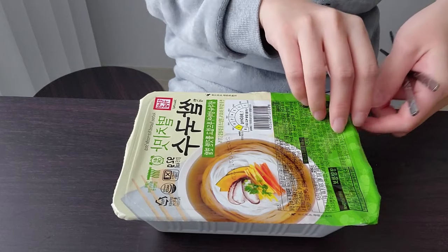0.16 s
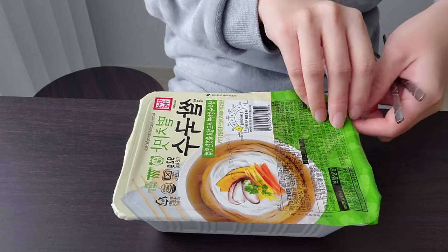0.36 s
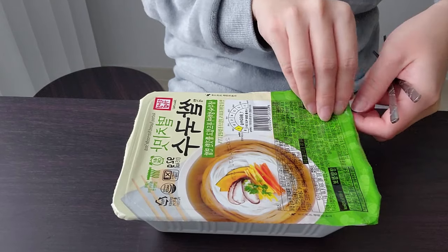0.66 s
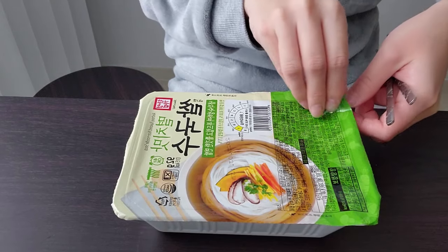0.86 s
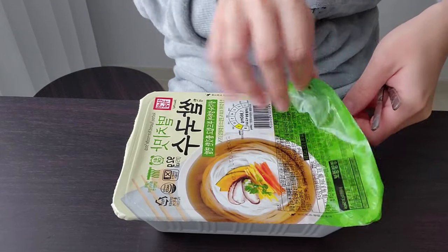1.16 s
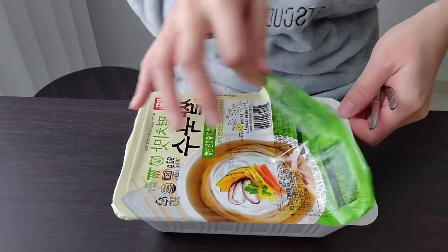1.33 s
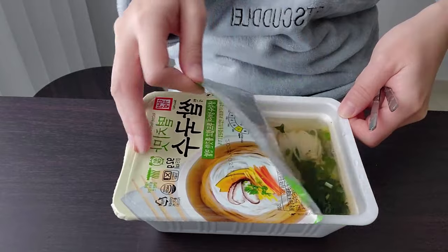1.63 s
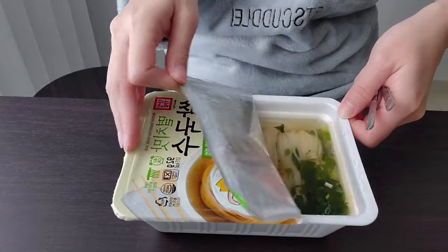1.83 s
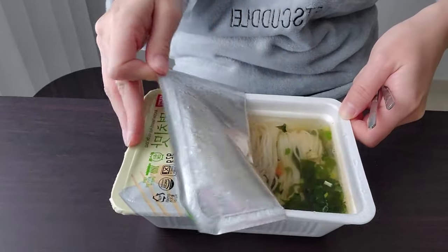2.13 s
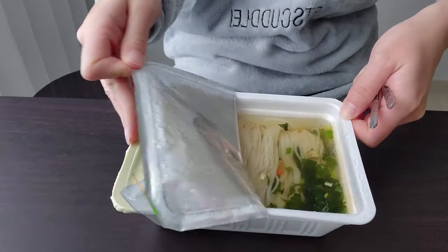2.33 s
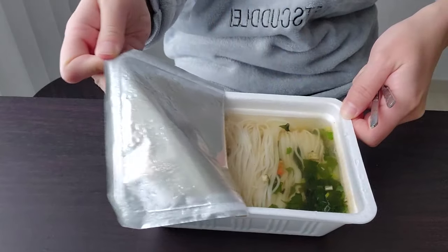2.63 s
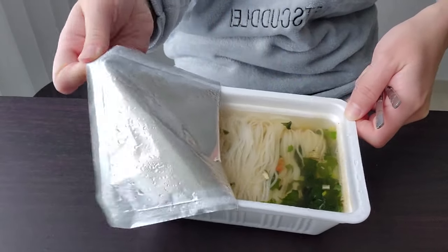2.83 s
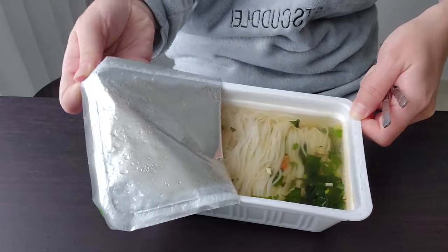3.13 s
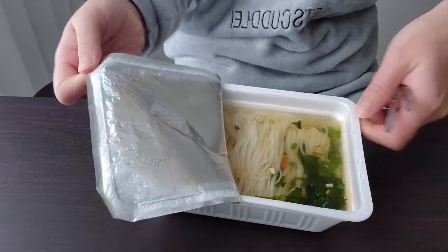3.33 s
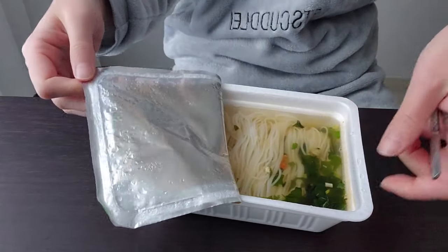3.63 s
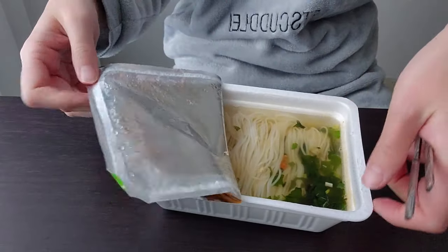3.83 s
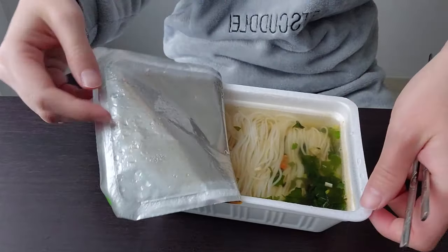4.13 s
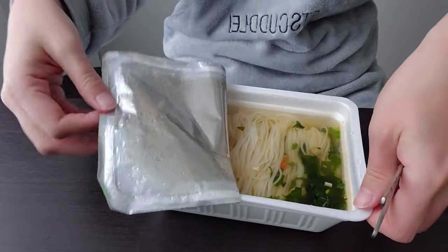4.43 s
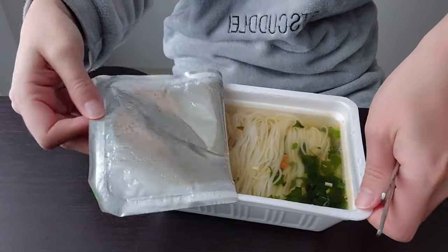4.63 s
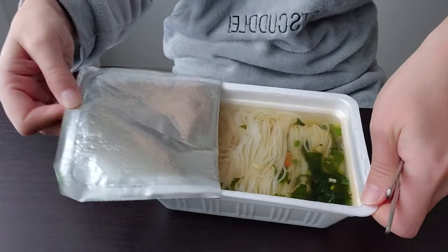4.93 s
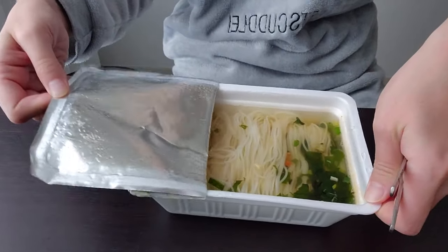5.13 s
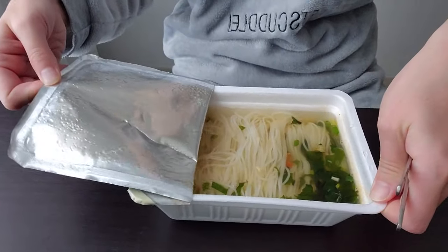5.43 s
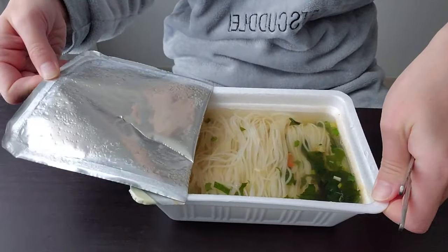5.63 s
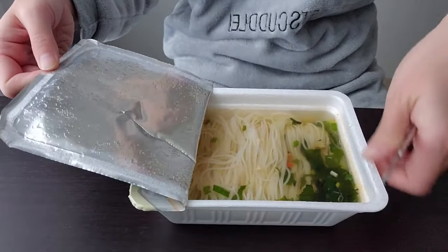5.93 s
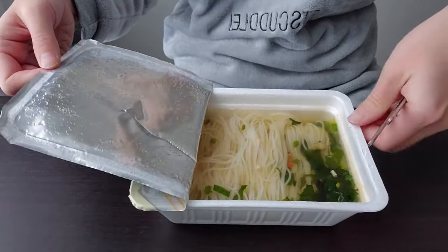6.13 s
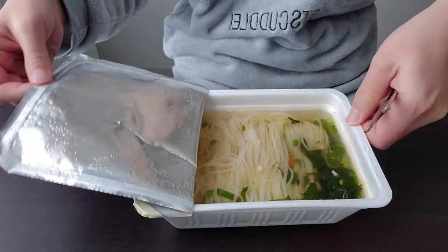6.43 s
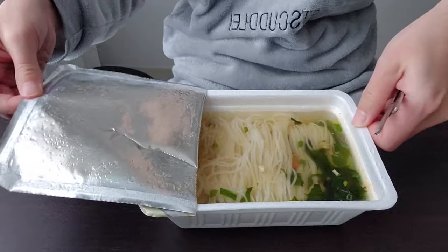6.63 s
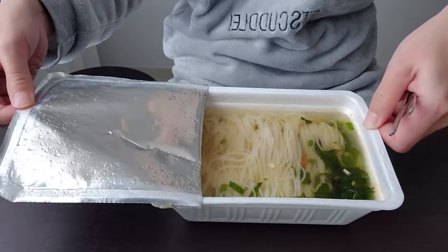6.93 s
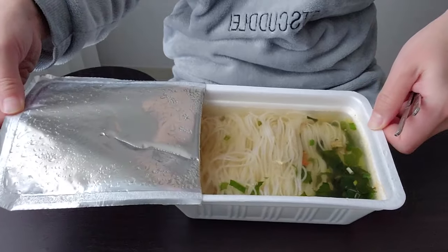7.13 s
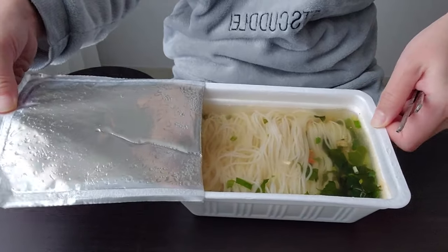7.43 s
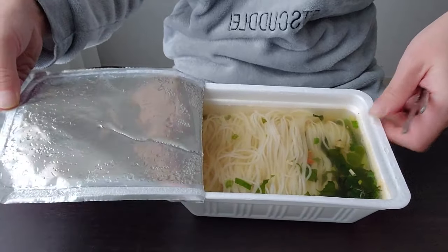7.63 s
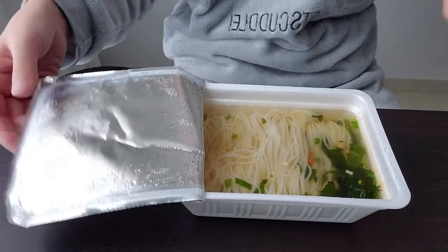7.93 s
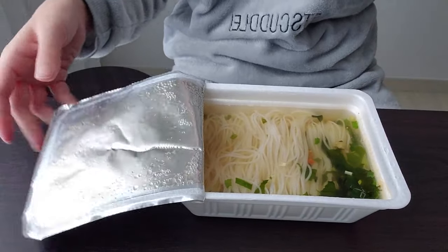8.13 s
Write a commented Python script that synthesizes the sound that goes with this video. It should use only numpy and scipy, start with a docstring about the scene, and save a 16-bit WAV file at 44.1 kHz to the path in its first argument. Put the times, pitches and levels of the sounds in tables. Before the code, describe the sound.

Close to the microphone in a small quiet room, a foil lid is pulled off a plastic noodle tray. Light ticks and fingernail scratches come first, then the glued seam tears in a dense, uneven crackle. After some rustling and snapping of loose foil comes a second pull, then a shorter, patchier third with a couple of dull thumps from the lid. Small crinkles and clicks end it.

```python
"""A foil lid peels off a plastic noodle tray in three pulls, on a table close to a phone.
The glued seam lets go in clusters of tiny ruptures that ring the foil, while the taut lid booms over
the tray like a soft drum. Creases buckle with sharp snaps that knock the tray. Fingernails pick at
the tab first, fingers slide and shift their grip, and a small quiet room answers."""
import sys
import numpy as np
from scipy import signal
from scipy.fft import rfft, irfft, next_fast_len
from scipy.io import wavfile
from scipy.ndimage import uniform_filter1d

SR = 44100
rng = np.random.default_rng(int(sys.argv[2]) if len(sys.argv) > 2 else 0)


def waveform_to_disk(signal):
    """Save audio, clipped to [-1, 1], as 16-bit WAV at the path in sys.argv[1]."""
    frames = np.transpose(np.atleast_2d(signal))
    scaled = np.clip(frames, -1, 1) * 32767
    samples = np.round(scaled).astype(np.int16)
    wavfile.write(sys.argv[1], SR, samples)


N = 364602
TIME = np.arange(N) / SR


def peel(gains):
    """The glued seam tears bond by bond, and every bond rings the foil."""
    clicks = ruptures(per_s=3300, spread_db=3.5, cluster_db=3.5, cluster_s=.004)
    foil = crackle(clicks, ring_s=.0017, likeness=.36, direct=6.5)
    return ride_bands(foil, gains, trims_db=(-2, -1.5, -1), even_s=.04)


# The long pulls. Each row: start, full force from, full force until and end in seconds,
# relative crack level in dB.
LONG_PULLS = [(1.803, 2.167, 2.7, 3.08, -50.5), (4.559, 4.83, 5.04, 5.62, -48.5),
              (6.396, 6.46, 7.16, 7.39, -57)]
# Runs of seam giving way. Each row: start and length in seconds, relative crack level in dB,
# body and boom offsets in dB.
SEAM_RUNS = [(1.847, .055, -43, -8, -18), (1.919, 0.061, -47, -3, -9.5), (2.01, 0.027, -59.5, 11, 7.5),
             (2.069, 0.031, -44.5, -0.5, -6), (2.156, 0.051, -42.5, -6, -7), (2.225, 0.052, -40, -3.5, -5),
             (2.331, 0.043, -40, -6, -0.5), (2.395, .035, -42, -2, 3.5), (2.509, 0.07, -45, -1.5, 1.5),
             (2.573, 0.029, -49, -5, -4), (2.63, 0.043, -43, -3.5, -3.5), (2.682, 0.035, -37, -7.5, -16),
             (2.739, .035, -45.5, -8, -10), (2.815, 0.025, -43, -11, -14), (2.923, 0.038, -48, -10.5, -18),
             (3.042, 0.028, -46.5, -6, -8), (4.588, 0.063, -51, -3.5, 1), (4.75, 0.036, -53.5, -4, 6.5),
             (4.817, .06, -41.5, -4, -2.5), (4.89, 0.091, -47.5, -7.5, -2), (4.951, 0.065, -44, -4.5, 1.5),
             (5.028, 0.059, -41.5, -6.5, -3), (5.106, 0.035, -46.5, 2.5, 3),
             (5.162, 0.12, -52.5, -7.5, 2.5), (5.3, 0.075, -56, -5, 3), (5.387, 0.11, -47.5, -5.5, -0.5),
             (5.553, 0.025, -54.5, -11.5, 4.5), (6.462, .075, -44, -11.5, -3.5),
             (6.626, 0.034, -52, -15, -6), (6.689, 0.053, -48, -9.5, -7), (6.821, 0.053, -40.5, -12, -7),
             (7.051, .04, -45, -11, -2.5), (7.108, 0.039, -44.5, -9.5, 0), (7.293, .048, -40.5, -8, -2.5)]

def seam(attack_s=.0051, release_s=.0074, slack_db=-16, fizz_db=-7):
    """Body, crack, fizz and boom gains of the seam, which creeps under each pull and gives in runs."""
    moves = []
    for start, full, until, end, db in LONG_PULLS:
        force = undb(np.interp(TIME, [start, full, until, end], [slack_db, 0, 0, slack_db]))
        creep = force * swell(start, end - start, attack_s, release_s)
        moves.append((creep, db + np.array([-7.5, 0, fizz_db, -1.5])))
    for start, length, db, body_db, boom_db in SEAM_RUNS:
        run = swell(start, length, attack_s, release_s)
        moves.append((run, db + np.array([body_db, 0, fizz_db, boom_db])))
    return blend(moves)


def ruptures(per_s, spread_db, cluster_db, cluster_s):
    """Tiny clicks, most weak and a few strong, that come in avalanches."""
    clicks = (rng.random(N) < per_s / SR) * rng.choice([-1, 1], N)
    strength_db = spread_db * np.minimum(rng.exponential(size=N), 5)
    return clicks * undb(strength_db + cluster_db * flicker(cluster_s))


# The foil's tone between its resonances. Each row: frequency in Hz, gain in dB.
FOIL_TONE = [(250, 3.5), (370, 2), (480, -3), (700, -4.5), (1000, -0.5), (1400, -3.5), (1850, -8.5),
             (3200, 2.5), (5000, 1), (8000, -10), (10000, -15), (13000, -8.5), (16000, -9.5)]
# Resonances of lid and tray wall. Each row: centre and width in Hz, strength in dB.
LID_RESONANCES = [(692, 220, 6), (1260, 69, 0), (1490, 120, 10), (2070, 460, 11), (4290, 360, -0.5),
                  (5580, 300, -1.5), (7630, 250, -3.5)]

def crackle(clicks, ring_s, likeness, direct, facets=10, patch_s=.015):
    """Each click strikes a foil facet: a sharp front, then a short flexural ring unlike at each ear."""
    t = TIME[:512]
    patch = rng.integers(facets, size=N)[(TIME / patch_s).astype(int)]
    struck = (patch + rng.integers(2, size=N)) % facets  # close clicks share a facet or the next
    out = np.zeros((2, N))
    for facet in range(facets):
        ring = ears(len(t), likeness) * np.exp(-t / ring_s)
        ring[[0, 1], rng.integers(4, size=2)] += direct  # each facet has its own angle to the ears
        out += [signal.oaconvolve(clicks * (struck == facet), unit(ear))[:N] for ear in ring]
    return singing_sheet(colour(out, FOIL_TONE, LID_RESONANCES))


# The freed sheet lies flat and sings. Each row: start and end in seconds, note in Hz.
SHEET_NOTES = [(2.7, 3.0, 2200), (3.04, 3.4, 2330), (5.18, 5.6, 2390), (6.42, 7.2, 2310)]

def singing_sheet(foil, gain_db=4.5, waver_db=2, ring_s=.0011, settle_s=.04):
    """The flat sheet adds its own wavering note to whatever shakes it."""
    notes = 0
    for start, end, hz in SHEET_NOTES:
        flat = swell(start, end - start, settle_s, settle_s)
        notes += flat * resonate(foil, hz, ring_s) * undb(gain_db + waver_db * flicker(settle_s))
    return foil + notes


# The lid as a drum skin. Each row: frequency in Hz, relative level in dB.
DRUM_TONE = [(25, -21), (50, -15.5), (70, -4), (82, -4), (97, 3.5), (120, -2.5), (150, -10), (175, -12.5),
             (200, -12), (240, -20), (290, -17), (400, -22.5), (600, -64.5)]

def boom(shake, left_db=2.3, side_db=-17, linger_s=.013):
    """Every slip jerks the taut lid, which drums on the air in the tray and lingers a moment."""
    jerks = ruptures(per_s=300, spread_db=1.5, cluster_db=1, cluster_s=.018)
    drum = colour(unit(jerks) + undb(side_db) * rng.standard_normal((2, N)), DRUM_TONE)
    decay = np.exp(-1 / (linger_s * SR))
    swing = signal.lfilter([1 - decay], [1, -decay], shake)
    pan = undb(np.array([[left_db], [-left_db]]) / 2)
    return steady(drum, span_s=.066) * swing * pan


# Creases and tray rim buckling. Each row: time in seconds, crack level in dB, body and fizz offsets
# in dB, facet pitch in Hz, time scale of the burst in seconds.
CREASE_SNAPS = [(.073, -41, 2, -14.5, 1210, 0.0028), (0.0801, -42.5, 9, -15.5, 1135, 0.001),
                (.085, -52.5, 12.5, -7.5, 1300, 0.0082), (0.2727, -48, -2, -4, 1950, 0.0026),
                (0.3002, -35, 3, -3, 1200, 0.0011), (0.423, -60, 14.5, -22, 1370, .003),
                (.6363, -40.5, -4.5, -7.5, 2140, 0.0017), (0.9555, -48, -7.5, -4, 1490, 0.0016),
                (1.010, -42.5, 4, -22, 2080, 0.0032), (1.2598, -45, 3, -19, 1550, 0.0019),
                (1.28, -61.5, 10.5, -28, 1180, .003), (1.3607, -34, -8.5, -10.5, 4250, 0.0036),
                (1.383, -51, 1, -21, 2780, 0.0018), (1.5881, -66.5, 13, 2, 1370, 0.0016),
                (1.7424, -43.5, -9.5, -26, 5400, 0.0027), (1.7818, -41.5, -2.5, -28, 3230, 0.0073),
                (1.819, -49.5, -4, -2, 5870, 0.00075), (1.85, -44.5, -5, 4, 7400, 0.0012),
                (1.963, -39, -5, -14, 4120, .0054), (2.002, -41.5, 5.5, -26.5, 1420, 0.0056),
                (2.186, -40, -3, -2, 3330, 0.0019), (2.229, -38.5, -5, -12, 3100, .003),
                (2.397, -34, -4, -13, 1330, 0.0074), (2.501, -35, -17, -9, 2320, 0.00053),
                (2.875, -48.5, -8, -2, 2100, .0005), (2.9822, -45, -3, -7, 2240, 0.0011),
                (3.043, -38.5, -11, -2, 2550, 0.0047), (3.237, -59.5, 11, -20, 1520, 0.0065),
                (3.498, -46.5, 2, -26, 1490, 0.0045), (3.7822, -47.5, -3.5, -25, 1490, 0.0062),
                (3.837, -54, 7.5, -33, 1400, .0046), (3.8936, -44.5, -8.5, -27, 3670, 0.0021),
                (3.919, -50, -8, -23, 3150, 0.0016), (4.081, -41.5, -12, -12, 3210, .005),
                (4.147, -50, 0.5, -14, 1160, .007), (4.217, -47, -18, -3.5, 3180, 0.0025),
                (4.277, -64, 15, -20, 960, .008), (4.375, -39, -4.5, -10.5, 3210, 0.0027),
                (4.4255, -47.5, 5.5, -33, 1720, 0.00085), (4.481, -36, -2.5, -6, 4400, 0.0018),
                (4.528, -60, 11.5, -21, 1570, 0.003), (4.6372, -38.5, -4, -4.5, 1570, 0.00043),
                (4.705, -48.5, -7.5, -7, 3250, .0006), (4.755, -45, 1.5, -9.5, 1450, 0.0024),
                (4.971, -46, 8, -10.5, 990, .006), (5.1121, -28, -13.5, -6.5, 4200, 0.0043),
                (5.1163, -28, -10, -12, 4100, 0.0047), (5.4436, -42, -13, -2.5, 2800, 0.0012),
                (6.418, -53, 1.5, -23, 1060, 0.0042), (6.477, -44.5, -9, 3, 2870, 0.00055),
                (6.5924, -43, -24, 3.5, 4370, 0.00076), (6.6703, -45.5, -7.5, -6, 4380, 0.0028),
                (7.0093, -40.5, -20, -3, 2810, 0.0018), (7.276, -38.5, -2, -17.5, 2170, 0.0025),
                (7.561, -40, -5, -16.5, 4230, .0011), (7.628, -45.5, 4, -6, 1110, 0.0024),
                (7.6354, -39.5, 2, -8, 1560, 0.0012), (7.6883, -38.5, -7, -10, 5650, 0.0031),
                (7.772, -49.5, -8, -4, 5300, 0.0013), (7.887, -52, -13.5, -4, 5400, 0.0015),
                (7.891, -60, 13, -23, 1010, 0.019), (7.973, -55.5, -2.5, -21, 3020, 0.0013),
                (8.017, -73.5, 16.5, -15, 904, .01), (8.169, -52, -4, -31, 1870, 0.0028),
                (8.1994, -53, -3.5, -3.5, 3083, .0025), (8.2486, -45, -10, -8, 5550, .0026),
                (8.2602, -39.5, -2.5, -13, 1300, .0064)]
# Modes of a flipped facet. Each row: multiple of the facet pitch, gain in dB.
FACET_MODES = [(0.561, -7), (0.999, 8.5), (1.73, -3.5), (2.9, -21)]

def snaps(ring_cycles=3.4, ring_db=-6.5, strain_db=-18.5, strain_s=.0033):
    """A crease creaks under strain and flips: a burst runs through the foil and the facet rings."""
    size, lead = 2048, 512
    t = TIME[:size] - TIME[lead]
    after = np.maximum(t, 0)
    strain = undb(strain_db) * np.exp(-abs(t) / strain_s)
    out = np.zeros((2, N + size))
    for at, db, body_db, fizz_db, hz, burst_s in CREASE_SNAPS:
        flip = np.exp(-after / (.79 * burst_s)) * (1 - np.exp(-after / (.2 * burst_s)))
        burst = ears(size, likeness=.5) * (flip + strain)
        # a facet radiates little below its lowest mode
        burst = butter(burst, 3, min(hz / 1.73, 1000), "high")
        ring = sum(undb(mode_db) * resonate(burst, multiple * hz, ring_cycles / hz)
                   for multiple, mode_db in FACET_MODES)
        snap = unit(colour(burst, FOIL_TONE, LID_RESONANCES)) + undb(ring_db) * unit(ring)
        gains = undb(db + np.array([body_db, 0, fizz_db]))
        snap = sum(gain * np.array([unit(ear) for ear in band]) for gain, band in zip(gains, bands(snap)))
        start = int(at * SR) - lead
        out[:, start:start + size] += snap * np.sqrt(.006 * SR / size)  # levels are rms over 6 ms
    return out[:, :N]


# The hollow tray on the table. Each row: pitch in Hz, ring time in seconds, gain in dB.
TRAY_MODES = [(290, 0.014, -2), (381, 0.0088, -1.5), (560, 0.0089, 0), (690, 0.0058, -3)]

def tray(gain_db=-18):
    """The more body a snap has, the harder it knocks the tray."""
    at, db, body_db = np.transpose(CREASE_SNAPS)[:3]
    knocks = np.zeros(N)
    knocks[(at * SR).astype(int)] = undb(db + body_db + gain_db)
    t = TIME[:SR // 5]
    ring = sum(undb(mode_db) * np.sin(2 * np.pi * hz * t) * np.exp(-t / ring_s)
               for hz, ring_s, mode_db in TRAY_MODES)
    return np.tile(signal.oaconvolve(knocks, ring)[:N], (2, 1))


# Soft thumps of the lid. Each row: start in seconds, peak level in dB.
LID_THUMPS = [(.125, -56), (.515, -53.5), (1.36, -55), (3.08, -51), (3.801, -53), (4.39, -49),
              (4.481, -38.5), (5.77, -52.5), (5.875, -55), (6.8748, -35), (7.328, -31), (7.632, -47),
              (7.69, -53), (7.92, -53)]

def thumps(hz=99, ring_s=.018, rise_s=.0038):
    """Pressed or suddenly slack, the lid swings a few times on its lowest note."""
    out = np.zeros(N)
    for start, db in LID_THUMPS:
        t = np.maximum(TIME - start, 0)
        envelope = 2 * np.exp(-t / ring_s) * (1 - np.exp(-t / rise_s)) ** 2
        out += undb(db) * envelope * np.sin(2 * np.pi * hz * t)
    return out


def rub(gains):
    """Skin and foil slide in fine, dense slips."""
    clicks = ruptures(per_s=6000, spread_db=4, cluster_db=4.5, cluster_s=.0051)
    foil = crackle(clicks, ring_s=.0017, likeness=.14, direct=2.9)
    return ride_bands(foil, gains, trims_db=(-2.5, -3.5, -2), even_s=.029)


# Fingers slide and loose foil flexes. Each row: start and length in seconds, relative crack level
# in dB, body and fizz offsets in dB.
FINGER_SLIDES = [(0.242, 0.046, -59, 5, -1), (0.321, 0.088, -66.5, 9, -11), (0.441, .12, -65.5, 3, -4),
                 (0.609, 0.013, -62.5, 2, -2), (0.929, 0.078, -65, -13, -2), (1.147, .013, -49, -3, -7),
                 (1.719, 0.036, -58.5, -3.5, -5), (1.85, .022, -47, -8, 3),
                 (3.259, 0.042, -45.5, -4.5, -12.5), (3.322, .04, -42.5, -10, -6),
                 (3.837, 0.083, -52.5, -8, -21), (3.967, 0.014, -65.5, -5, -7),
                 (4.066, 0.038, -53, -1.5, -4), (4.172, 0.062, -52.5, -14, -10),
                 (4.268, 0.11, -62.5, -8, -11), (4.363, 0.019, -45.5, -3.5, -11),
                 (4.388, 0.039, -55, 5.5, -26), (4.488, .05, -60.5, 5, -15), (5.62, 0.052, -67, -9, -5.5),
                 (5.758, .03, -70, -8, -11), (5.85, 0.02, -50, -6.5, -6.5), (6.199, 0.033, -60, -17, -26),
                 (6.338, 0.12, -61, -3, -6.5), (7.407, 0.013, -63.5, 7.5, -12),
                 (7.616, 0.056, -56.5, 6, -7)]

def slides(attack_s=.0061, release_s=.0058, boom_db=-9):
    """Body, crack, fizz and boom gains of the sliding fingers; the boom follows the body."""
    return blend([(swell(start, length, attack_s, release_s), db + np.array([body, 0, fizz, body + boom_db]))
                  for start, length, db, body, fizz in FINGER_SLIDES])


# Fingernails feel for the tab. Each entry: time in seconds.
NAIL_SCRATCHES = [0.804, 0.858, 0.994, 1.198]

def picking(level_db=-56, width_s=.0031):
    """Each probing fingernail scratches the lid softly."""
    clicks = ruptures(per_s=1500, spread_db=2.5, cluster_db=2, cluster_s=.005)
    rustle = unit(crackle(clicks, ring_s=.001, likeness=.5, direct=2))
    touches = sum(np.exp(-((TIME - at) / width_s) ** 2) for at in NAIL_SCRATCHES)
    return undb(level_db) * touches * rustle


# Changes of grip. Each row: start and end in seconds.
GRIP_SHIFTS = [(.22, 0.71), (.9, 1.72), (3.8, 4.6), (7.45, 7.84)]

def handling(level_db=-69, dull_hz=3200, fade_s=.02):
    """The foil gives faint stray ticks while the fingers shift their grip."""
    clicks = ruptures(per_s=110, spread_db=1, cluster_db=1, cluster_s=.05)
    ticks = crackle(clicks, ring_s=.0029, likeness=.35, direct=1.5, facets=4)
    grip = sum(swell(start, end - start, fade_s, fade_s) for start, end in GRIP_SHIFTS)
    return undb(level_db) * grip * unit(butter(ticks, 2, dull_hz, "low"))


def finger_damping(foil, free_s=1.9, damped_hz=9500):
    """While the lid is still glued down and pressed by fingers, its finest ripples are muted."""
    dull = signal.sosfiltfilt(signal.butter(3, damped_hz, fs=SR, output="sos"), foil)
    openness = np.interp(TIME, [0, free_s, free_s + .069], [.3, .4, 1])
    return dull + openness * (foil - dull)


# The working spot drifts a little left of centre. Each row: time in seconds, left over right in dB.
SPOT_PAN = [(0, 1.5), (1.349, 4), (1.799, 2), (3.499, 4), (6.9, 2), (7.7, 3)]
# Its sound reaches the right ear later. Each row: time in seconds, lag in seconds.
RIGHT_EAR_LAG = [(1, 0), (1.8, .00011)]

def place(x):
    """Lag and shadow between the ears follow the working spot."""
    lag = np.round(np.interp(TIME, *np.transpose(RIGHT_EAR_LAG)) * SR).astype(int)
    right = x[1, np.clip(np.arange(N) - lag, 0, N - 1)]
    side_db = np.interp(TIME, *np.transpose(SPOT_PAN)) / 2
    return np.array([x[0] * undb(side_db), right * undb(-side_db)])


# The small room's tail. Each row: frequency in Hz, seconds to fall by 60 dB.
ROOM_DECAY = [(150, .4), (500, 0.51), (1400, 0.39), (4000, 0.34), (12000, 0.56)]

def room(x, early_db=-6, early_s=.018, late_db=-14.5, treble_db=-12.5):
    """Table and body scatter the sound at once; the walls add a short tail. Both come back duller."""
    t = TIME[:SR // 2]
    centres_hz = np.sqrt(np.multiply(BAND_EDGES_HZ[:-1], BAND_EDGES_HZ[1:]))
    t60s = np.interp(centres_hz, *np.transpose(ROOM_DECAY))
    diffuse = bands(ears(len(t), likeness=0))
    late = sum(band * np.exp(-np.log(1000) * t / t60) for t60, band in zip(t60s, diffuse))
    early = ears(len(t), likeness=.42) * (rng.random(len(t)) < .12) * np.exp(-t / early_s)
    response = undb(early_db) * unit(early * (t > .002)) + undb(late_db) * unit(late * (t > .008))
    response = colour(response / np.sqrt(len(t)), [(300, .1), (2500, .025), (12000, treble_db)])
    return signal.fftconvolve(x, response, axes=1)[:, :N]


# Quiet room tone. Each row: frequency in Hz, relative level in dB.
ROOM_TONE = [(20, -19), (48, 5.5), (75, -2), (120, 7.5), (170, -12), (300, -12.5), (600, -23), (1500, -32),
             (4000, -34), (8000, -38.5), (10000, -52.5), (16000, -44.5)]

def air(level_db=-68, waver_db=.23):
    """The room's faint rumble lies under an even hiss."""
    return undb(level_db + waver_db * flicker(.35)) * unit(colour(ears(N, likeness=.15), ROOM_TONE))


# The three bands of the foil sound: body, crack and fizz. Each entry: band edge in Hz.
BAND_EDGES_HZ = [300, 1800, 7000, 16000]

def bands(x):
    """Split into body, crack and fizz."""
    return [butter(x, 4, edges, "band") for edges in zip(BAND_EDGES_HZ, BAND_EDGES_HZ[1:])]


def ride_bands(foil, gains, trims_db, even_s):
    """Even out body, crack and fizz, then let each follow the hand's movements."""
    return sum(undb(db) * gain * steady(band, even_s)
               for db, gain, band in zip(trims_db, gains, bands(foil)))


def swell(start, length, attack_s, release_s):
    """Gain of one movement: it builds up, holds and dies away."""
    return np.exp(np.minimum(TIME - start, 0) / attack_s
                  - np.maximum(TIME - start - length, 0) / release_s)


def blend(moves):
    """Gains over time of several movements (envelope, levels in dB); their powers add."""
    envelopes, levels = zip(*moves)
    return np.sqrt(undb(levels).T ** 2 @ np.array(envelopes) ** 2)


def flicker(hold_s):
    """A random level that takes a new course every hold_s; spread near 1."""
    return np.interp(TIME / hold_s, np.arange(N // 16), rng.standard_normal(N // 16))


def ears(size, likeness, wide_hz=900):
    """Two noises sharing a fraction of their power; what differs lies mostly above wide_hz."""
    own = butter(rng.standard_normal((2, size)), 1, wide_hz, "high")
    return np.sqrt(likeness) * rng.standard_normal(size) + np.sqrt(1 - likeness) * own


def resonate(x, hz, ring_s):
    """One damped mode, gain 1 at its centre."""
    pole = np.exp((2j * np.pi * min(hz, .45 * SR) - 1 / ring_s) / SR)
    return 2 * (1 - abs(pole)) * signal.lfilter([1], [1, -pole], x).real


def colour(x, outline, modes=()):
    """Causal filter from a (Hz, dB) outline with resonances standing on it."""
    size = next_fast_len(x.shape[-1] + 4096) // 2 * 2
    f = np.arange(size // 2 + 1) * SR / size + 1
    hz, db = np.transpose(outline)
    gain = undb(np.interp(np.log(f), np.log(hz), db))
    gain *= 1 + sum(undb(peak) / np.hypot(1, 2 * (f - centre) / width) for centre, width, peak in modes)
    cepstrum = irfft(np.log(gain))[:size // 2]
    cepstrum[1:] *= 2  # minimum phase
    return irfft(rfft(x, size) * np.exp(rfft(cepstrum, size)), size)[..., :x.shape[-1]]


def butter(x, order, hz, kind):
    """Low-, high- or band-pass filter."""
    return signal.sosfilt(signal.butter(order, hz, kind, fs=SR, output="sos"), x)


def steady(x, span_s):
    """Hold the rms near 1 over every stretch of span_s."""
    power = uniform_filter1d(np.atleast_2d(x ** 2).mean(axis=0), int(span_s * SR))
    return x / np.sqrt(np.abs(uniform_filter1d(power, int(span_s * SR / 2))) + 1e-12)


def unit(x):
    """Scale to rms 1."""
    return x / np.sqrt(np.mean(x ** 2) + 1e-20)


def undb(db):
    """Decibels to gain."""
    return 10 ** (np.asarray(db) / 20)


def scene():
    """Foil and tray with their room, the drumming lid and the still air."""
    *tearing, seam_shake = seam()
    *sliding, finger_shake = slides()
    foil = peel(tearing) + rub(sliding) + picking() + handling() + snaps()
    near = place(finger_damping(foil) + tray())
    return near + room(near) + boom(seam_shake + finger_shake) + thumps() + air()


def record(dry):
    """The phone cuts the top above 16 kHz."""
    return signal.sosfilt(signal.ellip(10, .2, 70, 16000, fs=SR, output="sos"), dry)


dry = scene()
out = record(dry)
waveform_to_disk(out)
```